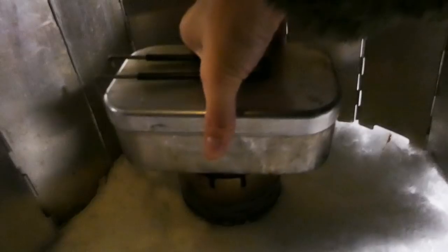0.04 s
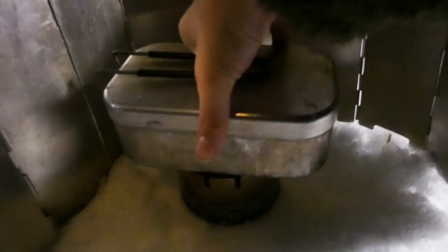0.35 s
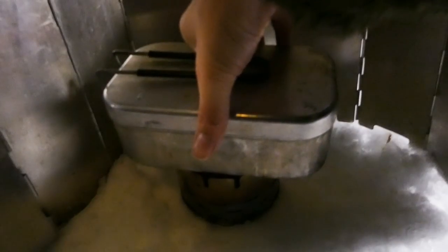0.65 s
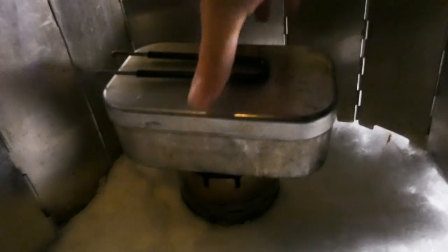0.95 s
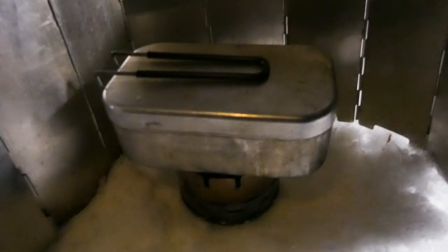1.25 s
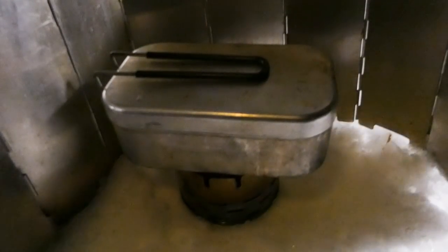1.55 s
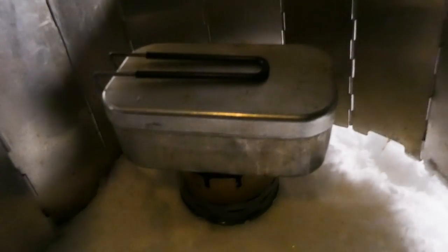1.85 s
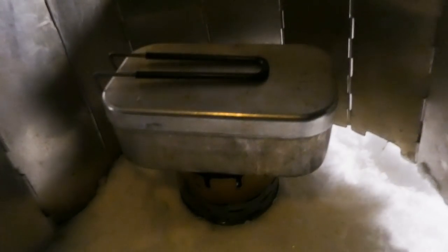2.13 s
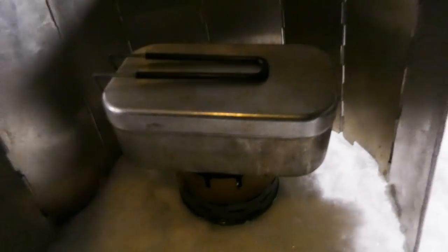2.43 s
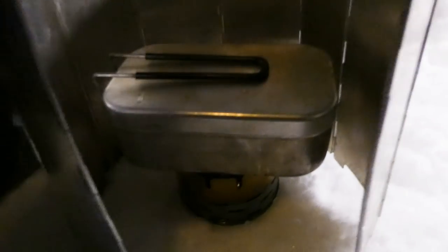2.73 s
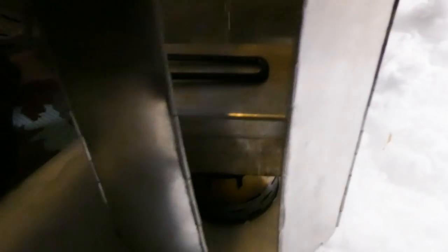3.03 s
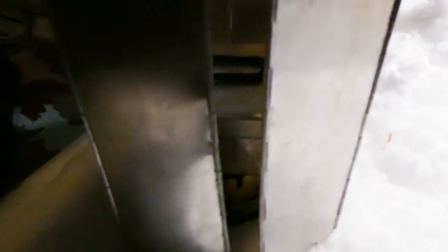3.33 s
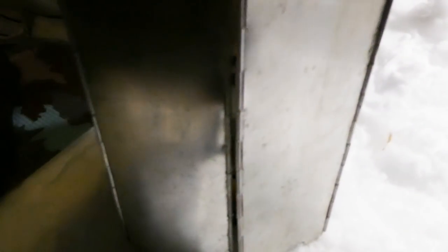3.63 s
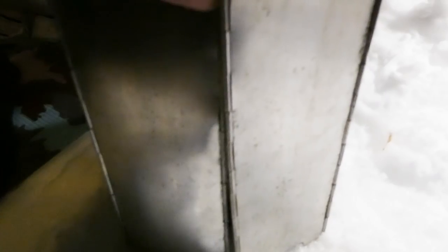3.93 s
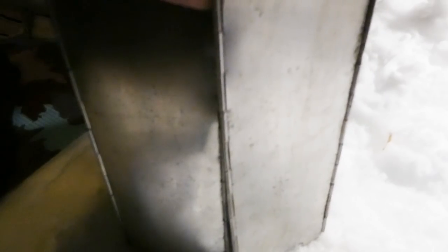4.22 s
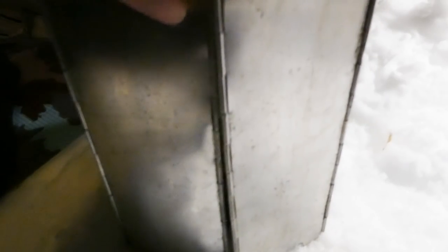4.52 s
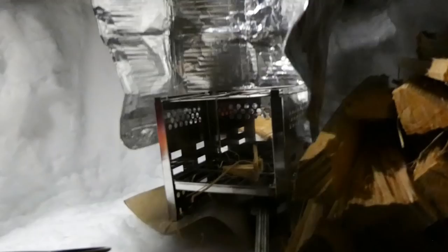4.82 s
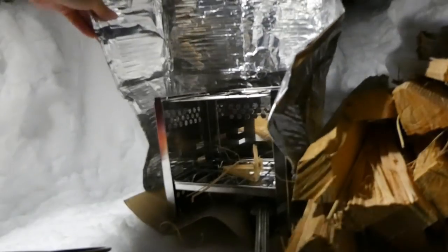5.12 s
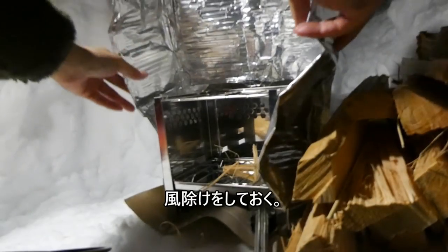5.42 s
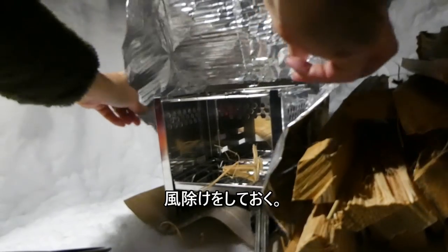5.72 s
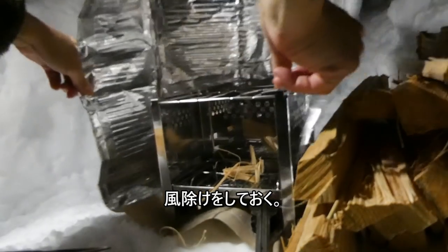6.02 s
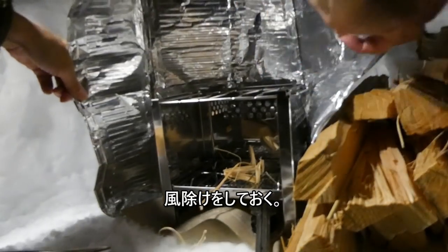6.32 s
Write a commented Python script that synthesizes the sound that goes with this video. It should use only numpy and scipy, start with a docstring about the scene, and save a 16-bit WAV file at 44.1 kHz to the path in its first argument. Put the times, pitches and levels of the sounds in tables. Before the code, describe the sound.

A steady, wide outdoor rush runs throughout. Low puffs of wind buffet the microphone during the first second and return on and off until about 4.3 seconds, strongest near 1.6 and 2. From about 1.4 seconds a folding aluminium windshield is dragged shut close in front: its edges grind through snow in short scrapes and its hinged panels click, most clearly at 1.6, 2.2 and 2.5, with faint icy ticks between. More scrapes follow around 2.9 and 3.4. At 3.9 the panels close with a sharp knock and scrape, the loudest moment, followed by a few faint ticks. From about 4.9 seconds a sheet of foil is bent round a small stove, wobbling and crinkling continuously, with crisp snaps as creases give way. It thins out after 6.1 and ends at about 6.4 seconds.

```python
"""A camp kitchen in the snow, the gear close in front of a stereo microphone. A steady outdoor rush lies
behind it, and puffs of wind break on the microphone. A folding aluminium windshield is dragged shut
round a mess tin in short scrapes: its edges grind through the snow and its hinged panels click. Then a
sheet of foil is bent round a small stove, wobbling, crinkling and snapping as its creases give way."""
import sys
import numpy as np
from scipy import signal
from scipy.fft import rfft, irfft, next_fast_len
from scipy.io import wavfile
from scipy.ndimage import uniform_filter1d

SR = 44100
rng = np.random.default_rng(int(sys.argv[2]) if len(sys.argv) > 2 else 0)


def inscribe(sig):
    """Save sig as 16-bit PCM at rate SR to the path in sys.argv[1].

    A 1-D sig is mono; a 2-D sig holds one channel per row.
    Samples are clipped to [-1, 1] before scaling.
    """
    pcm = np.round(np.clip(np.atleast_2d(sig).T, -1, 1) * 32767)
    wavfile.write(sys.argv[1], SR, pcm.astype(np.int16))


N = 280520
TIME = np.arange(N) / SR

# Levels are relative within each table; the functions set the balance.
# outdoor rush, with a soft hiss of the sliding windshield near 2.3 s: t/s, level/dB, treble gain/dB
RUSH_LEVELS = [(0.02, -33, -5), (0.2, -31, -8.5), (0.75, -33.5, -6.5), (1.45, -30, -1), (1.95, -35, -7.5),
               (2.3, -36, 4.5), (2.72, -36, -2), (3.25, -32.5, 1.5), (3.5, -35, -2), (3.85, -32, -1.5),
               (4.8, -32, -4), (6.32, -36, -15)]
# colour of the rush: f/Hz, level/dB
RUSH_SPECTRUM = [(25, -48), (60, -19), (130, -8.5), (250, -10), (400, -13), (530, -6), (760, -4),
                 (1100, -7.5), (1900, -7), (3200, -10.5), (5000, -14.5), (7900, -22), (10000, -22),
                 (16000, -34)]
# stereo width of the rush: f/Hz, side minus mid/dB
RUSH_WIDTH = [(60, 6), (200, 4.5), (400, 4), (700, -5), (1300, -5.5), (2400, -9), (8000, -15),
              (15000, -3.5)]
# gusts on the microphone: t/s (a gust starts half a length before it and peaks half a length after it),
# length/s, level/dB
GUSTS = [(0.151, .072, -11.5), (0.285, .12, -6.5), (0.468, 0.02431, -18), (0.59, 0.19, -17),
         (0.799, 0.077, -10), (0.885, .085, -14), (1.345, .055, -26.5), (1.435, 0.046, -19.5),
         (1.606, .03, -2), (1.964, .02, -6), (1.983, 0.056, -14.5), (2.079, 0.034, -14.5),
         (2.477, 0.032, -18.5), (2.603, .035, -17), (2.673, 0.041, -13), (2.829, .025, -8),
         (2.87, .17, -22.5), (3.296, .15, -15), (3.45, 0.052, -13.5), (3.52, 0.16, -19), (4.277, .048, -17)]
# colour of a gust: f/Hz, level/dB
GUST_SPECTRUM = [(30, -37), (60, -16.5), (110, -3), (170, -1.5), (240, -8), (350, -19), (600, -35),
                 (1200, -58), (4000, -80)]
# panels and hinges knock: t/s, t60/s, level/dB, favoured ring f/Hz
KNOCKS = [(.485, 0.028, -31.5, 2200), (1.454, 0.036, -22.5, 4800), (1.559, 0.036, -13, 4500),
          (1.755, 0.046, -22, 2430), (2.224, 0.032, -16.5, 1020), (2.38, 0.03434, -26, 4300),
          (2.498, .051, -10.5, 2420), (2.675, 0.039, -23.5, 2160), (3.108, 0.038, -25, 2392),
          (3.907, 0.019, 0, 1530), (4.056, 0.01296, -25.5, 12300), (4.573, 0.037, -29.5, 9100),
          (4.61, 0.046, -35, 7000)]
# colour of metal on snow: f/Hz, level/dB
PANEL_SPECTRUM = [(80, -18), (200, 2), (400, -3.5), (1000, -2.5), (2500, -0.5), (4500, -2), (6500, -3.5),
                  (8000, -7), (9700, -5), (12000, -10.5), (16000, -14.5)]
# ring of the panels: f/Hz, width/Hz, peak/dB
PANEL_MODES = [(735, 25, 4.5), (1570, 96, -1), (2450, 230, 4.5), (2800, 83.3, 2), (3770, 180, 4.5),
               (5428, 100, 0.5), (6980, 60.9, 6)]
# a smaller struck patch rings higher, mostly with less body and more edge: f/Hz, body/dB, edge/dB
PANEL_PATCHES = [(900, 12, -6), (2470, 5.5, -4.5), (4600, 2.5, 8.5), (12000, 4, 4)]
# windshield dragged over snow: t/s, length/s, level/dB, brightness/dB
SCRAPES = [(1.412, 0.07737, -27.5, 7), (1.642, 0.061, -22, -6), (1.684, .075, -19, -7.5),
           (2.378, .038, -29.5, -2), (2.51, 0.12, -20.5, -2), (2.702, 0.02951, -33.5, -5.5),
           (2.81, 0.056, -32, 7), (2.858, 0.04, -24, 2), (2.902, 0.035, -20, 4.5), (2.925, 0.16, -22.5, 0),
           (3.177, 0.03, -26.5, 4), (3.246, 0.025883, -35.5, 4), (3.35, .095, -15, -1),
           (3.57, 0.062, -33, -1), (3.642, 0.055, -29.5, -2.5), (3.904, 0.041, -7.5, 3.5),
           (4.4, .034, -37, 9), (4.485, 0.071, -29.5, -0.5)]
# a gentle push swells, a hard shove starts at once: level/dB, share of the length before the peak
SCRAPE_RISE = [(-23.5, 0.44), (-16.5, 0.034)]
# effort of the hands bending the foil: t/s, level/dB
FOIL_EFFORT = [(4.86, -20.5), (4.93, -22.5), (5.09, -19), (5.16, -22), (5.27, -19), (5.54, -30),
               (5.605, -18.5), (5.7, -24.5), (5.8, -22), (5.94, -22.5), (6.04, -22.5), (6.125, -21),
               (6.19, -32), (6.35, -34)]
# colour of the foil: f/Hz, level/dB
FOIL_SPECTRUM = [(30, -26), (70, -27), (160, -6.5), (280, -3), (400, -1), (700, -5), (1200, -6.5),
                 (2400, -5.5), (4500, -8), (6200, -11.5), (7700, -17.5), (9600, -14.5), (12000, -23),
                 (16000, -27)]
# ring of the foil sheet: f/Hz, width/Hz, peak/dB
FOIL_MODES = [(365, 15, 4.5), (493, 49, 3.5), (580, 17.32, 3.5), (773, 19, 5), (998, 90, 5),
              (1164, 23.75, 4.5), (1435, 22, 3.5), (1720, 23.7, 3.5), (2330, 19.48, 4.5), (2873.5, 19, 5),
              (3380, 220, 0.5), (3902.5, 40, 3), (5800, 64, 2.5), (8250, 60, -3.5)]
# a crease snaps through: t/s, t60/s, level/dB, favoured ring f/Hz
SNAPS = [(4.883, 0.041, -18, 1860), (4.947, 0.0266, -18, 2570), (5.003, 0.023, -16.5, 4380),
         (5.104, 0.25, -13, 1580), (5.1665, 0.085, -14, 3380), (5.206, .083, -20.5, 3600),
         (5.318, 0.074, -13, 3680), (5.529, 0.11, -20.5, 2510), (5.565, 0.0953, -16, 4300),
         (5.6235, 0.088, -12.5, 4600), (5.7155, 0.084, -16, 4400), (5.903, 0.11, -15.5, 4470),
         (6.059, 0.063, -17.5, 3800), (6.089, 0.027, -12, 4400), (6.148, .048, -25, 2865),
         (6.217, .072, -24.5, 4462), (6.276, 0.062, -28.5, 3920), (6.346, .034, -25, 3500)]
# tone of the snapping patch by its ring: f/Hz, body/dB, edge/dB
FOIL_PATCHES = [(1500, 0.5, -20), (2640, -14, -4.5), (4180, -11.5, 9)]
# foil squeezed: t/s, length/s, level/dB, brightness/dB
CRUMPLES = [(4.96, 0.051, -26.5, 3), (5.03, .078, -15, -3), (5.255, .07, -16, -6), (5.372, 0.081, -24, 1.5),
            (5.735, .052, -18.5, 1), (5.846, .074, -14.5, 5), (5.925, .11, -20, 4.5), (6.07, 0.042, -22, 5)]


def undb(db):
    """Decibels to gain."""
    return 10 ** (np.asarray(db) / 20)


def unit(x):
    """Scale to rms 1."""
    return x / np.sqrt(np.mean(x ** 2) + 1e-18)


def add(track, start_s, sound):
    """Mix a sound into a track."""
    start = int(start_s * SR)
    track[start:start + len(sound)] += sound[:N - start]


def colour(x, points, modes=()):
    """Causal filter from (f/Hz, level/dB) points with resonances on top."""
    size = next_fast_len(len(x) // 2 + 4096) * 2
    hz = np.maximum(np.arange(size // 2 + 1) * SR / size, 1)
    corners, gains = np.transpose(points)
    db = np.interp(np.log(hz), np.log(corners), gains)
    for centre, width, peak in modes:
        db = db + peak / (1 + (2 * (hz - centre) / width) ** 2)
    cepstrum = irfft(db * np.log(10) / 20)
    cepstrum[1:size // 2] *= 2  # folding the cepstrum gives minimum phase
    cepstrum[size // 2 + 1:] = 0
    return irfft(rfft(x, size) * np.exp(rfft(cepstrum)))[:len(x)]


def grains(samples, per_s, spread_db):
    """Tiny impulses at random times; a positive spread gives many weak and a few strong."""
    chance, size, sign = rng.random((3, samples))
    strength = undb(-spread_db * np.log(np.maximum(size, np.exp(-4))))
    return (chance < per_s / SR) * strength * np.sign(sign - .5)


def rush():
    """A wide, faintly grainy rush of the surroundings; its treble lifts where the windshield slides."""
    times, level_db, treble_db = np.transpose(RUSH_LEVELS)
    noises = (rng.standard_normal(N) + 0.61 * unit(grains(N, per_s=1500, spread_db=-2))
              for _ in range(2))
    mid, side = (colour(noise, RUSH_SPECTRUM) for noise in noises)
    stereo = (mid + colour(side, RUSH_WIDTH) * np.array([[1], [-1]])) / mid.std()
    treble = signal.sosfiltfilt(signal.butter(1, 5000, "high", fs=SR, output="sos"), stereo)
    stereo = stereo + treble * (undb(np.interp(TIME, times, treble_db)) - 1)
    return stereo * undb(np.interp(TIME, times, level_db) - 0.76)


def flutter(per_s, depth_db):
    """Eddies come in clumps: a gain that glides between random levels."""
    hold = int(SR / per_s)
    steps = rng.standard_normal(N)[np.arange(N) // hold]
    return undb(depth_db * uniform_filter1d(steps, hold))


def wind(steepness=8.3):
    """Gusts break right on the microphone in separate eddies; a harder gust reaches higher in pitch."""
    out = np.zeros(N)
    clumps = flutter(per_s=70, depth_db=3)
    for mark_s, length, db in GUSTS:
        span = np.linspace(-1, 1, int(2 * length * SR))
        force = clumps[int(mark_s * SR):][:len(span)] / np.sqrt(1 + np.abs(2.2 * span) ** steepness)
        eddies = unit(grains(len(span), per_s=900, spread_db=3.5))
        eddies += 0.23 * rng.standard_normal(len(span))
        puff = colour(np.pad(force * eddies, (0, SR // 20)), GUST_SPECTRUM)
        puff = colour(puff, [(200, 0), (500, 0.28 * (db + 24))])
        puff *= np.sqrt(length * SR) / np.linalg.norm(puff)
        add(out, mark_s - length / 2 - .003, undb(db) * puff)
    return out


def tail(t60):
    """Countless close modes of a thin sheet, dying together."""
    t = np.arange(int(max(t60, .004) * SR * 1.5)) / SR
    return rng.standard_normal(len(t)) * np.exp(-np.log(1000) * t / t60)


def ring(clicks, t60, ring_db):
    """Each click is followed by the short ring of one facet of the sheet."""
    response = tail(t60)
    response = response * undb(ring_db) / np.linalg.norm(response)
    response[0] += 1
    return signal.oaconvolve(clicks, response)[:len(clicks)]


def bent(modes, peak_db):
    """Each new bend of the sheet adds eight passing resonances of its own."""
    centres_hz = 1200 * 10 ** rng.random(8)
    return list(modes) + [(hz, .025 * hz, peak_db) for hz in centres_hz]


def blows(table, spectrum, modes, patches, crack, peak_db, width_share):
    """A patch of metal cracks and rings; its size sets the favoured pitch, the body and the edge."""
    out = np.zeros(N)
    patch_hz, *tones = np.transpose(patches)
    for start_s, t60, db, hz in table:
        sound = np.pad(tail(t60), (0, SR // 20))
        sound[0] += crack
        sound = colour(sound, spectrum, bent(modes, peak_db=7.5))
        body_db, edge_db = (np.interp(np.log(hz), np.log(patch_hz), column) for column in tones)
        body = [(150, body_db - 4), (400, body_db + 3.5), (900, body_db)]
        edge = [(2300, 0), (3400, 0), (7500, edge_db)]
        sound = colour(sound, body + edge, [(hz, width_share * hz, peak_db)])
        # the level counts the energy over a third of the ring time
        add(out, start_s, undb(db) * sound * np.sqrt(t60 * SR / 3) / np.linalg.norm(sound))
    return out


def stroke(length_s, rise_share, end_db):
    """Force of one push: it builds, peaks and lets go."""
    progress = np.linspace(0, 1, int(length_s * SR))
    force = undb(np.interp(progress, [0, rise_share, 1], [end_db, 0, end_db]))
    return force * signal.windows.tukey(len(force), .15)


def pushes(table, spectrum, modes, rise, edge_db, per_s, spread_db, end_db, t60, ring_db, facets=8):
    """Every push sets off a shower of slips, spread over several facets of the metal."""
    out = np.zeros(N)
    for start_s, length, db, bright_db in table:
        force = stroke(length, rise(db), end_db)
        slips = (force * grains(len(force), per_s / facets, spread_db) for _ in range(facets))
        sound = sum(ring(np.pad(facet, (0, SR // 20)), t60, ring_db) for facet in slips)
        sound = colour(sound, spectrum, bent(modes, peak_db=4.5))
        # broad bends give body, sharp contacts give edge; a brighter push trades body for edge
        tone = [(900, -bright_db), (2300, 0), (3900, 0.01), (8500, edge_db + 0.49 * bright_db)]
        sound = colour(sound, tone)
        add(out, start_s, undb(db) * unit(sound) * np.sqrt(len(sound) / len(force)))
    return out


def windshield():
    """Panel edges grind through icy snow and knock at their hinges."""
    scrapes = pushes(SCRAPES, PANEL_SPECTRUM, PANEL_MODES,
                     rise=lambda db: np.interp(db, *np.transpose(SCRAPE_RISE)),
                     edge_db=1, per_s=7000, spread_db=3.5, end_db=-9.5, t60=0.018, ring_db=1.5)
    knocks = blows(KNOCKS, PANEL_SPECTRUM, PANEL_MODES, PANEL_PATCHES,
                   crack=3.585, peak_db=10, width_share=0.36)
    return undb(-5) * scrapes + undb(-1) * knocks


def ice_ticks():
    """Fine icy grains tick faintly on the windshield while it is handled."""
    handled = np.interp(TIME, [1.2, 2.6, 4.5, 4.85], [0, 1, 1, 0])
    clicks = ring(grains(N, per_s=14, spread_db=4), t60=.007, ring_db=2)
    return undb(-30) * handled * colour(clicks, [(2000, -22), (6000, -6), (10000, -1), (16000, 0)])


def foil_rustle(start_s=4.856, held_s=5.38, settle_s=.12, usual_effort_db=-22.5):
    """Small creases give way all the time; the sheet hangs free, then settles against the stove."""
    effort_db = np.interp(TIME, *np.transpose(FOIL_EFFORT))
    held = np.clip((TIME - held_s) / settle_s + .5, 0, 1)
    # settling takes away body and edge; more effort makes the sound thinner and sharper
    body_db = 5.5 - 4 * held - 0.21 * (effort_db - usual_effort_db)
    edge_db = -4 * held + 0.15 * (effort_db - usual_effort_db)
    facets = (ring(grains(N, per_s=80, spread_db=3), t60=0.061, ring_db=8.5) for _ in range(10))
    sheet = unit(colour(sum(facets), FOIL_SPECTRUM, FOIL_MODES))
    body, below_edge = (signal.sosfiltfilt(signal.butter(2, hz, fs=SR, output="sos"), sheet)
                        for hz in (1200, 5500))
    bands = [(body, undb(body_db)), (below_edge - body, 1), (sheet - below_edge, undb(edge_db))]
    rustle = sum(band * gain for band, gain in bands)
    power = sum(band.var() * gain ** 2 for band, gain in bands)
    return rustle / np.sqrt(power) * undb(effort_db - 2) * (TIME > start_s)


def foil():
    """Foil bent round the stove: squeezes and single snapping creases stand out of the rustle."""
    rustle = foil_rustle()
    crumples = pushes(CRUMPLES, FOIL_SPECTRUM, FOIL_MODES, rise=lambda db: .48,
                      edge_db=1.5, per_s=2400, spread_db=3, end_db=-10.5, t60=0.059, ring_db=5)
    snaps = blows(SNAPS, FOIL_SPECTRUM, FOIL_MODES, FOIL_PATCHES,
                  crack=1.9, peak_db=7.5, width_share=0.31)
    return rustle + undb(-3.5) * crumples + undb(-1.5) * snaps


def close_ahead(x, pan_db, side_db):
    """A source close in front of the microphone; reflections off nearby metal give a little width."""
    echoes = tail(t60=0.032)
    side = signal.fftconvolve(x, echoes / np.linalg.norm(echoes))[:N]
    side = colour(side, [(110, 3), (380, -1), (1300, -1), (3000, 0), (8000, -10), (14000, 7.5)])
    direct = x * undb(np.array([[pan_db], [-pan_db]]) / 2)
    return direct + undb(side_db) * side * np.array([[1], [-1]])


def scene():
    """Gear straight ahead, the rush behind; wind pushes the two channels mostly in opposite ways."""
    buffets = undb(-2) * wind() * np.array([[1], [-1]]) + undb(-16.5) * wind()
    gear = close_ahead(windshield() + ice_ticks(), pan_db=0.5, side_db=-13)
    gear += close_ahead(foil(), pan_db=0.4, side_db=-13.5)
    return gear + rush() + buffets


def gain_control(x, limit_db=-5.5, detect_s=0.0026, recover_s=0.2):
    """Loud moments at the microphone push the gain down at once; it creeps back afterwards."""
    power = uniform_filter1d(np.mean(x ** 2, axis=0), int(detect_s * SR))
    excess_db = np.maximum(10 * np.log10(np.abs(power) + 1e-12) - limit_db, 1e-9)
    decay = TIME / recover_s
    cut_db = np.exp(np.maximum.accumulate(np.log(excess_db) + decay) - decay)  # decaying peak hold
    return x * undb(-cut_db)


def record(dry):
    """Behind the microphone, the camera ducks loud moments, clips the tallest peaks and cuts the top."""
    top_cut = signal.ellip(10, .1, 70, 15900, fs=SR, output="sos")
    return signal.sosfilt(top_cut, np.clip(gain_control(dry), -1, 1))


dry = scene()
out = record(dry)
inscribe(out)
```